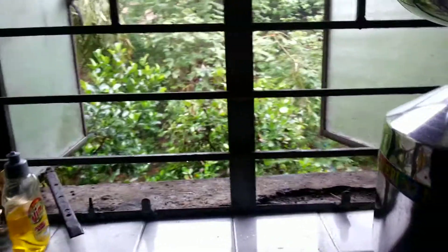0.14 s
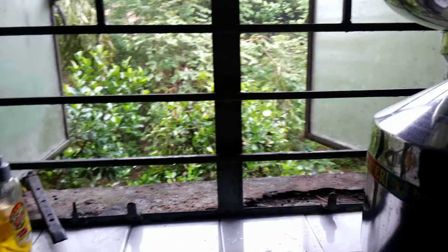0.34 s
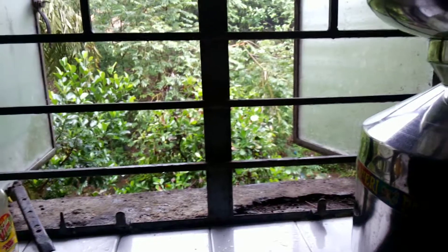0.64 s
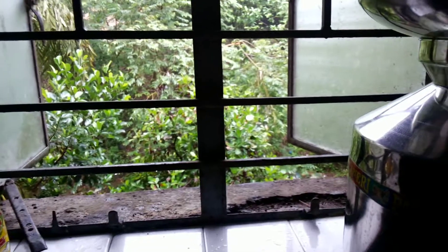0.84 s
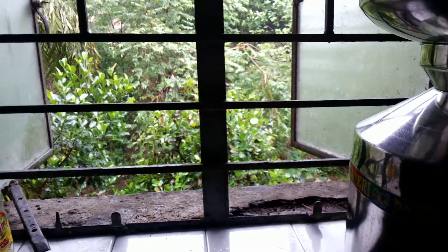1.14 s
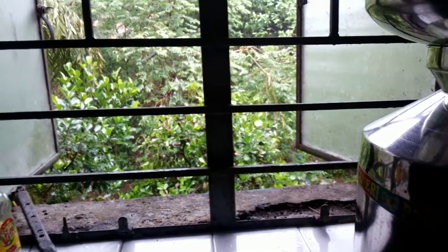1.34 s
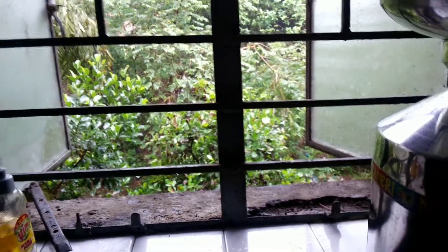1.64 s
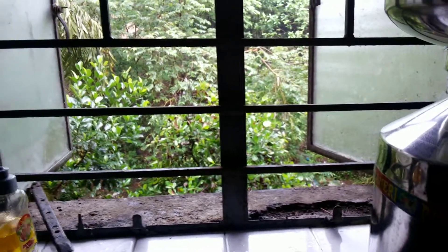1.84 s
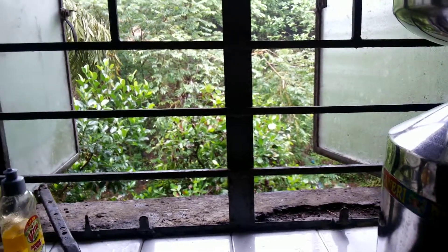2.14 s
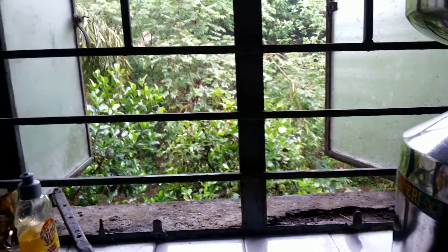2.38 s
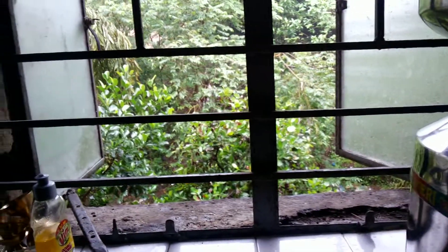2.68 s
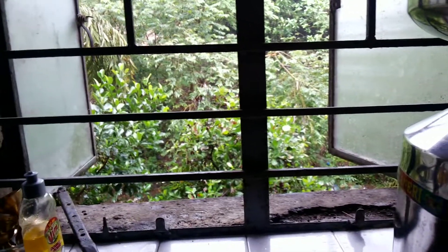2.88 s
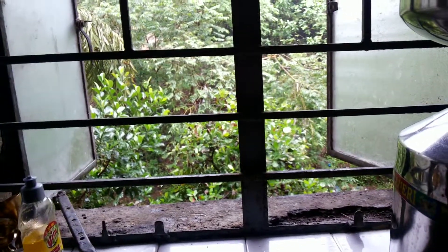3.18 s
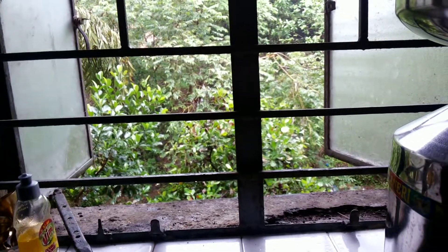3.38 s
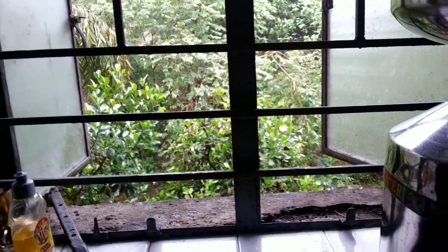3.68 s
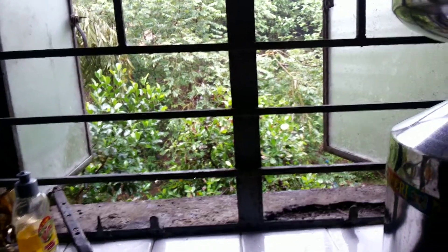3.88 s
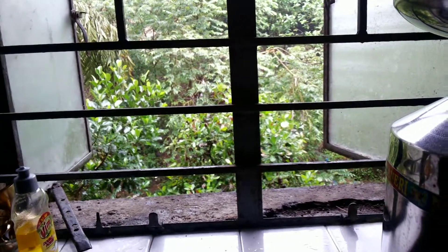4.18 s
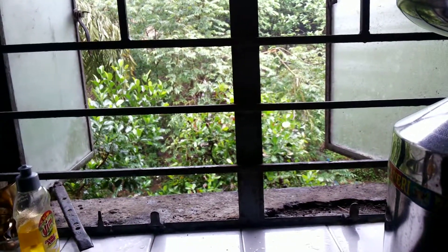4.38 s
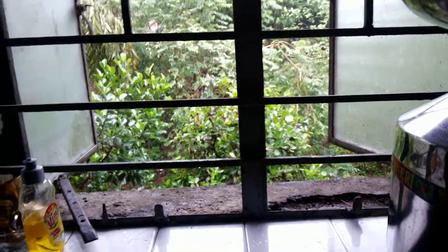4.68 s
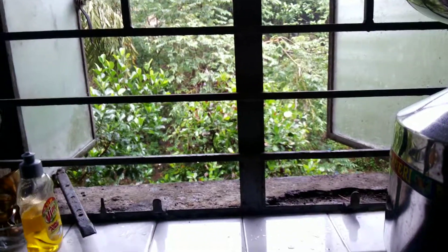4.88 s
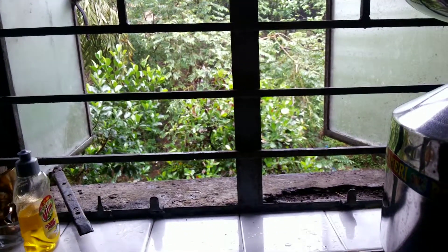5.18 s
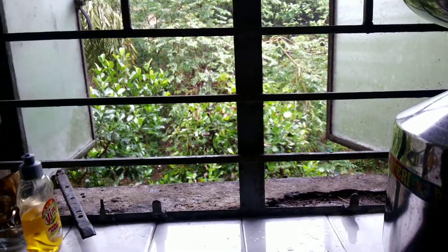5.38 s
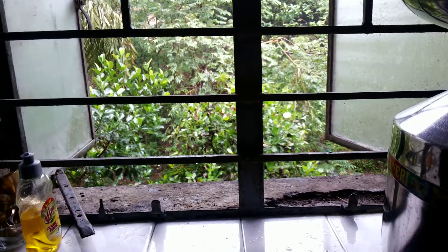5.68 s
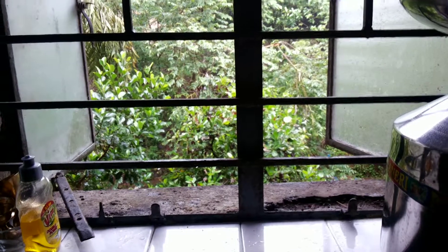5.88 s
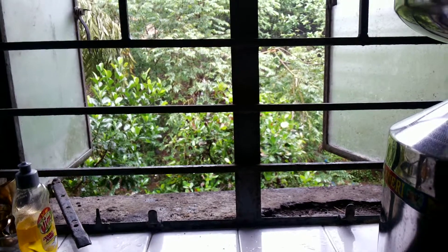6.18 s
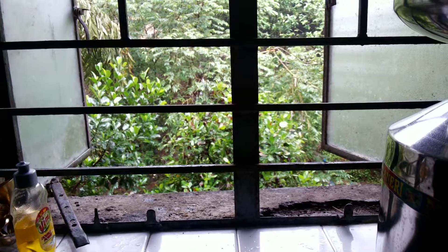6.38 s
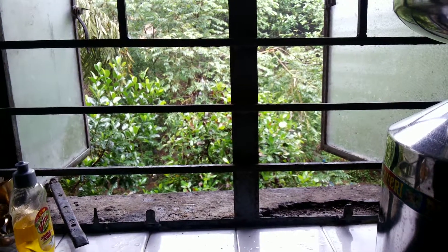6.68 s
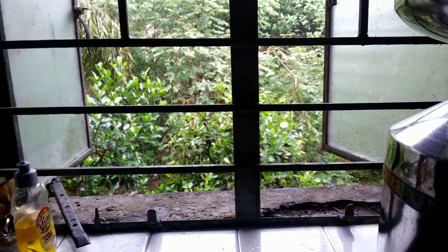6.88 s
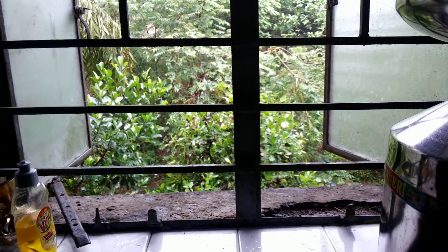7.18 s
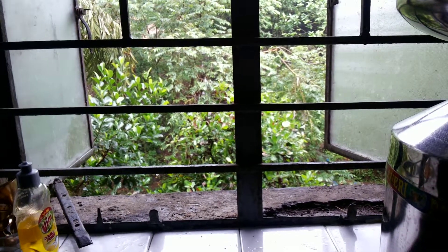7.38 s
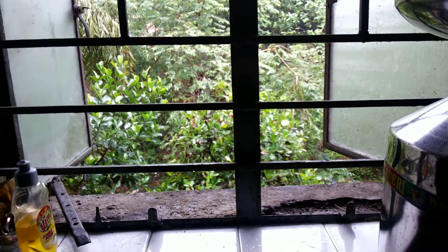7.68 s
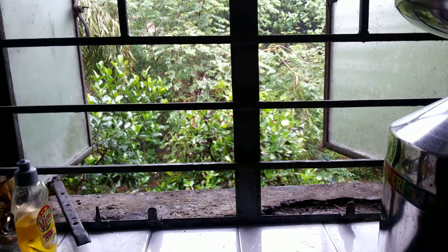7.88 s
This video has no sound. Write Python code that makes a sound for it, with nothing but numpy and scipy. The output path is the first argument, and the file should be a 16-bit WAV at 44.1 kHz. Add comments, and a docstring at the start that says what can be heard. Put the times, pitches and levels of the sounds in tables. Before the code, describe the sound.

A squirrel chirps outside an open kitchen window: one shrill falling call, a couple of short hoarse chirps with light rustles, then three loud calls in quick succession. Three softer rising whines follow, perhaps from a bird. A thin, distant trill comes and goes over a steady garden hiss and a faint machine hum. Heard from indoors, each call rings briefly in the tiled room.

```python
"""Shrill squirrel chirps outside an open kitchen window: notes that whip down, hold, then slide away.
Three rising whines follow, perhaps from a bird; a thin far trill comes and goes.
Chirps and whines are harmonic tones shaped by a throat and roughened by pitch jitter and flutter.
Rustles, ticks and soft bumps are noise bursts. The tiled room rings after each call,
over a steady garden hiss and the faint hum of a household machine."""
import sys
import numpy as np
from scipy import signal
from scipy.fft import rfft, irfft, next_fast_len
from scipy.io import wavfile
from scipy.ndimage import uniform_filter1d, minimum_filter1d

SR = 44100
rng = np.random.default_rng(int(sys.argv[2]) if len(sys.argv) > 2 else 0)


def transcribe(u):
    """Save the signal u as a 16-bit wav file named by the first command-line argument.

    u: samples, shape (n,) or (channels, n), limited to [-1, 1]; the rate is SR.
    q: integer samples, one column per channel.
    """
    v = np.clip(np.atleast_2d(u).T, -1, 1)
    q = np.round(v * 32767).astype(np.int16)
    wavfile.write(sys.argv[1], SR, q)


N = 354563


def squirrel_voice(hz, db, overtones_db, rough, falloff_db=7, jitter=.09):
    """Shrill harmonic tone; as roughness (0-1) rises it tears and its overtones turn to rasp."""
    # Throat response. Each row: frequency in Hz, gain in dB.
    throat = [(1000, -5.5), (3000, 2.5), (5200, 5), (6200, -17.5), (7400, -4.5), (8600, -31), (11000, -17),
              (14000, -43)]
    # Rasp spectrum. Each row: frequency in Hz, relative level in dB.
    air_spectrum = [(2000, -19.5), (3800, -1.5), (4900, 0), (5600, -4), (6500, -13), (7800, -24.5),
                    (8800, -30.5), (12000, -31.5), (15500, -31)]
    size, rough = len(hz), ramp(rough)
    phase = 2 * np.pi * np.cumsum(hz * (1 + jitter * rough * waver(size, rate_hz=397))) / SR
    fundamental = amp(read(throat, hz)) * np.sin(phase) * ragged(size, 1.3 * rough ** 2, rate_hz=370)
    overtones = sum(amp(read(throat, k * hz) - falloff_db * (k - 2)) * np.sin(k * phase)
                    * (k * hz < SR / 2) for k in range(2, 5))
    air = noise(size, lambda f: amp(read(air_spectrum, f))) / np.sqrt(2)
    breakup = np.minimum(2.4 * rough, 1)
    upper = np.sqrt(1 - breakup ** 2) * overtones + breakup * air
    return faded(amp(db) * (fundamental + amp(overtones_db) * upper))


def full_calls(top_hz=5066, sag=.016, slide_octaves=1.17, attack_s=.008, change_s=.007):
    """Squirrel: a rough whip down to a pure, sagging note, which tears into a fading slide."""
    # Each row: start, whip, hold and slide in seconds, held pitch in Hz, whip gain in dB,
    # whip roughness 0-1, then held gain, swell over the hold, held overtones and slide gain in dB.
    calls = [(0.507, 0.045, .055, 0.037, 2444, -21, 0.34, -20, -9, -28, -24.5),
             (3.037, .019, .054, .056, 3590, -22, .6, -13, 0, -16, -13),
             (3.484, .019, .052, 0.052, 3742, -17, .6, -13, 0.5, -16, -9.5),
             (3.934, 0.018, .049, 0.061, 3603, -19, 0.65, -7.5, -5.5, -26, -11)]
    for (start, whip_s, hold_s, slide_s, held_hz, whip_db, whip_rough,
         held_db, swell_db, overtones_db, slide_db) in calls:
        release_s = whip_s + hold_s
        t = np.arange(0, release_s + slide_s, 1 / SR)
        whip = ramp(1 - t / whip_s)
        hold = ramp((t - whip_s) / hold_s) - .5
        slide = ramp((t - release_s) / slide_s)
        octaves = np.log2(top_hz / held_hz) * whip ** 2.1 - slide_octaves * slide ** .85
        hz = held_hz * 2 ** octaves * (1 - sag * hold)
        # Crossfade weights of the three stages.
        whipping, sliding = ramp((whip_s - t) / change_s), ramp((t - release_s) / change_s)
        holding = 1 - whipping - sliding
        db = (whipping * (whip_db - 6 * ramp(1 - t / attack_s))
              + holding * (held_db + swell_db * hold)
              + sliding * (slide_db - 26 * slide ** 4))
        upper_db = -9 * whipping + holding * overtones_db - 15 * sliding
        rough = whipping * whip_rough * np.sqrt(whip) + .034 * holding + .35 * sliding
        yield start, squirrel_voice(hz, db, upper_db, rough)


def lead_ins(scoop=.34, rasp_share=.55, attack_s=.0076):
    """The squirrel's voice catches: flat, weak and raspy, then clearer and on pitch."""
    # Each row: start and length in seconds, pitch in Hz, gain and overtones in dB,
    # first and last roughness 0-1.
    notes = [(0.467, 0.037, 5150, -21.5, -14, 0.82, 0.28), (2.608, .034, 1480, -44, 11, .03, .04),
             (2.995, 0.038, 2354, -33.5, -3.5, 0.8, 0.1), (3.435, .046, 2414, -33.5, -4, .9, 0),
             (3.888, .051, 2415, -36, -1, .9, 0)]
    for start, length_s, hz, db, overtones_db, first_rough, last_rough in notes:
        u = progress(length_s)
        catching = ramp(1 - u / rasp_share)
        pitch_hz = hz * (1 - scoop * first_rough * catching ** 2)
        envelope_db = -13.5 * catching - 18 * ramp(1 - u * length_s / attack_s)
        upper_db = overtones_db + 26.5 * first_rough * catching
        rough = last_rough + (first_rough - last_rough) * np.sqrt(catching)
        yield start, squirrel_voice(pitch_hz, db + envelope_db, upper_db, rough)


def short_chirps(peak_share=.71, dulling_db=18):
    """Squirrel: single hoarse falls that swell, lose their overtones and stop."""
    # Each row: start and length in seconds, first and last pitch in Hz, gain and overtones in dB,
    # roughness 0-1.
    chirps = [(0.413, 0.068, 3350, 2170, -26, -4, 0.2), (1.822, .066, 3273, 1738, -23.5, -10.5, 0.23),
              (2.625, 0.054, 3012, 1769, -21, -8, 0.35)]
    for start, length_s, first_hz, last_hz, db, overtones_db, rough in chirps:
        u = progress(length_s)
        hz = first_hz * (last_hz / first_hz) ** (u ** .85)
        rise_db = -17 * ramp(1 - u / peak_share) ** 2
        fade_db = -19 * ramp((u - peak_share) / (1 - peak_share)) ** 2
        upper_db = overtones_db - dulling_db * (u - .5)
        yield start, squirrel_voice(hz, db + rise_db + fade_db, upper_db, rough)


def ticks():
    """Bright snaps, about a millisecond long, at the height of two chirps."""
    # Each row: start in seconds, level in dB.
    snaps = [(3.566, -35), (4.0285, -33.5)]
    for start, db in snaps:
        click = np.diff(rng.standard_normal(91))
        yield start, amp(db) * unit(click * np.hanning(len(click)) ** 2)


def whine_voice(hz, db, bright_db, harmonics, jitter, rough):
    """Shaky harmonics through a fixed throat; the upper ones are hoarse."""
    # Throat response. Each row: frequency in Hz, gain in dB.
    throat = [(600, -16), (950, -13.5), (1250, 1), (2800, 1), (3500, 0), (4300, 14), (5400, 2), (8000, 9.5),
              (9500, -10)]
    size = len(hz)
    phase = 2 * np.pi * np.cumsum(hz * (1 + jitter * waver(size, rate_hz=144))) / SR
    tone = np.zeros(size)
    for k, harmonic_db in harmonics:
        partial_db = harmonic_db + read(throat, k * hz) + bright_db * max(k - 2, 0)
        tone += amp(partial_db) * np.sin(k * phase) * ragged(size, rough * k ** 2, rate_hz=550)
    return faded(tone * amp(db))


def nasal_whine():
    """A high whine that falters once and dulls as it climbs."""
    # Contour. Each row: time in seconds, pitch in Hz, gain in dB.
    curve = [(5.211, 1282, -47), (5.238, 1420, -31), (5.256, 1390, -30), (5.278, 1315, -40),
             (5.300, 1405, -31), (5.322, 1389, -34), (5.340, 1476, -29), (5.392, 1598, -27.5),
             (5.445, 1650, -39)]
    # Each row: harmonic number, gain in dB.
    harmonics = [(1, -9.5), (2, 3), (3, -11.5), (4, -11), (5, -28), (6, -29)]
    times, pitches_hz, gains_db = np.transpose(curve)
    t = np.arange(times[0], times[-1] + .0019, 1 / SR)
    hz, db = np.interp(t, times, pitches_hz), np.interp(t, times, gains_db)
    bright_db = 4 - 34 * np.log2(hz / hz[0])
    return times[0], whine_voice(hz, db, bright_db, harmonics, jitter=.004, rough=.005)


def hollow_whines(attack_s=.026, release_s=.03, hoarse_s=.046):
    """Whines that start hoarse, climb about an octave and ease off at the top."""
    # Each row: start and length in seconds, first and last pitch in Hz, gain and swell in dB,
    # brightness in dB per harmonic above the second.
    rises = [(6.136, .211, 677, 1344, -38, -5, -1), (7.218, .230, 632, 1398, -37.5, 4, -0.5)]
    # Each row: harmonic number, gain in dB.
    harmonics = [(1, 0), (2, 2), (3, -16), (4, -17), (5, -25), (6, -30)]
    for start, length_s, first_hz, last_hz, db, swell_db, bright_db in rises:
        u = progress(length_s)
        t = u * length_s
        hz = last_hz + (first_hz - last_hz) * (1 - u) ** 1.2
        edges = ramp(1 - t / attack_s) + ramp(1 - (length_s - t) / release_s)
        envelope_db = swell_db * (u - .5) - 9.5 * edges
        upper_db = bright_db + 6 * ramp(1 - t / hoarse_s)
        yield start, whine_voice(hz, db + envelope_db, upper_db, harmonics, jitter=.009, rough=.012)


def far_trills(note_hz=6400, notes_per_s=4, arch=.019, quaver=.009):
    """Strings of thin, uneven notes, each a small arch in pitch."""
    # Each row: start and end in seconds, level in dB.
    trills = [(0.967, 1.64, -57.5), (2.871, 3.757, -56.5), (5.127, 5.857, -57)]
    for start, end, db in trills:
        t = np.arange(0, end - start, 1 / SR)
        note = abs(np.sin(np.pi * notes_per_s * t))
        hz = note_hz * (1 + arch * (note - .5) + quaver * waver(len(t), rate_hz=170))
        envelope = amp(db) * note ** 2 * ragged(len(t), rough=.4, rate_hz=40)
        yield start, faded(envelope * np.sin(2 * np.pi * np.cumsum(hz) / SR))


def rustles_and_bumps():
    """Short rasps and rustles, and soft low bumps: one puff of noise each."""
    # Each row: start and length in seconds, level in dB, centre in Hz, width in octaves.
    rustles = [(1.182, .366, -56.5, 1960, 0.24), (1.447, 0.29, -51, 1622, .21),
               (1.583, 0.057, -46, 2580, 0.63), (1.599, 0.0092, -39, 4030, 0.13),
               (1.999, 0.07, -43, 2400, 0.67), (2.47, 0.044, -36.5, 2400, 0.71),
               (2.531, 0.049, -39, 2310, 0.74), (4.44, .043, -55, 4200, 0.5),
               (4.431, 0.086, -61, 248, 0.34), (7.907, .129, -55.5, 1590, .255)]
    # Each row: start in seconds, level in dB.
    bumps = [(3.959, -80), (4.361, -68), (4.797, -65), (5.865, -65)]
    for start, length_s, db, centre_hz, octaves in rustles:
        yield start, puff(length_s, db, centre_hz, octaves)
    for start, db in bumps:
        yield start, puff(length_s=.11, db=db, centre_hz=68, octaves=.46)


def garden():
    """Low murmur and leafy hiss, both drifting a little."""
    # Two noise spectra. Each row: frequency in Hz, relative density in dB.
    murmur_spectrum = [(20, -24.5), (45, -30.5), (70, -11), (88, -20.5), (120, -6), (200, -2), (300, 0),
                       (400, -2), (540, -2), (630, -5), (1000, -8.5), (1400, -33.5)]
    hiss_spectrum = [(590, -29.5), (1000, -6.5), (1300, -7), (1570, -6), (2550, -4.5), (2760, -9.5),
                     (3000, -5.5), (3250, -5.5), (3560, -9), (3730, -5.5), (3950, -5.5), (4090, -3),
                     (4810, -6.5), (6800, -21.5), (15800, -28.5)]
    # Each row: time in seconds, murmur and hiss levels in dB.
    levels = [(0, -54.5, -49.5), (1.4, -54, -49.5), (2.3, -55, -50.5), (3.3, -52.5, -48.5),
              (4.3, -53.5, -50), (4.9, -54.5, -51), (6.5, -55, -51), (8.04, -55, -49.5)]
    times, murmur_db, hiss_db = np.transpose(levels)
    t = np.arange(N) / SR
    murmur = noise(N, lambda hz: amp(read(murmur_spectrum, hz)))
    murmur *= amp(np.interp(t, times, murmur_db) + .5 * waver(N, rate_hz=4.8))
    hiss = noise(N, lambda hz: amp(read(hiss_spectrum, hz)))
    hiss *= amp(np.interp(t, times, hiss_db) + .12 * waver(N, rate_hz=8.5))
    return murmur + hiss


def hum(drift_hz=2.515, flutter=.26):
    """Faint wavering tones of a household machine."""
    # Each row: frequency in Hz, level in dB.
    tones = [(441.4, -65), (543.7, -63), (2659, -66.5), (3844, -61)]
    out = np.zeros(N)
    for hz, db in tones:
        phase = 2 * np.pi * np.cumsum(hz + drift_hz * waver(N, rate_hz=7.7)) / SR
        out += amp(db) * unit(np.sin(phase) * (1 + flutter * waver(N, rate_hz=12)))
    return out


def kitchen(x, scatter_s=.011, build_up_s=.008):
    """Direct sound, quick scatter off shutters and sill, and a dense tail that dies band by band."""
    # Each row: frequency in Hz, time to decay 60 dB in seconds.
    t60 = [(200, .45), (1500, 0.45), (3000, 0.48), (5000, 0.36), (10000, 0.49)]
    direct_db, scatter_db, tail_db = -4.5, -5, -1
    hz, t, bands = signal.stft(rng.standard_normal(SR), SR, nperseg=256)
    tail = signal.istft(bands * amp(-60 * t / read(t60, hz)[:, None]), SR, nperseg=256)[1]
    t = np.arange(len(tail)) / SR
    tail *= 1 - np.exp(-t / build_up_s)
    scatter = rng.standard_normal(len(t)) * np.exp(-t / scatter_s)
    response = amp(tail_db) * tail / np.linalg.norm(tail)
    response += amp(scatter_db) * scatter / np.linalg.norm(scatter)
    response[0] += amp(direct_db)
    return signal.fftconvolve(x, response)


def puff(length_s, db, centre_hz, octaves):
    """Tapered burst of noise in one band."""
    size = int(length_s * SR)
    band = noise(size, lambda hz: np.exp(-.5 * (np.log2((hz + 1) / centre_hz) / octaves) ** 2))
    return amp(db) * band * signal.windows.tukey(size, .5)


def noise(size, shape):
    """Noise of rms 1 with magnitude spectrum shape(Hz)."""
    length = next_fast_len(size + 2048)
    hz = np.fft.rfftfreq(length, 1 / SR)
    return unit(irfft(rfft(rng.standard_normal(length)) * shape(hz), length))[:size]


def waver(size, rate_hz):
    """Smooth random motion up to rate_hz."""
    return noise(size, lambda hz: 1 / (1 + (hz / rate_hz) ** 4))


def ragged(size, rough, rate_hz):
    """Gain of steady power: constant at roughness 0, pure flutter at 1."""
    rough = ramp(rough)
    return np.sqrt(1 - rough) + np.sqrt(rough) * waver(size, rate_hz)


def faded(x, edge_s=.0007):
    """Soft start and stop."""
    t = np.arange(len(x)) / SR
    return x * ramp(np.minimum(t, t[-1] - t) / edge_s)


def amp(db):
    """Decibels to gain."""
    return 10 ** (np.asarray(db) / 20)


def unit(x):
    """Scales to rms 1."""
    return x / np.sqrt(np.mean(x ** 2) + 1e-20)


def read(points, hz):
    """Interpolates on a log-frequency axis."""
    f, value = np.transpose(points)
    return np.interp(np.log(hz + 1), np.log(f + 1), value)


def ramp(x):
    """Clips to 0-1."""
    return np.clip(x, 0, 1)


def progress(length_s):
    """Runs from 0 to 1."""
    return np.linspace(0, 1, int(length_s * SR))


def add(mix, start_s, sound):
    """Mixes a sound in at start_s."""
    part = mix[max(round(start_s * SR), 0):][:len(sound)]
    part += sound[:len(part)]


def scene():
    """The callers move about, so each sound takes its own path into the room and keeps its energy."""
    sounds = [*full_calls(), *lead_ins(), *short_chirps(), nasal_whine(), *hollow_whines(),
              *far_trills(), *rustles_and_bumps()]
    mix = garden() + hum()
    for start, sound in sounds:
        heard = kitchen(sound)
        add(mix, start, heard * np.linalg.norm(sound) / np.linalg.norm(heard))
    for start, tick in ticks():  # no room ring
        add(mix, start, tick)
    return mix[None]


def record(dry, threshold=.82, ceiling=.75, knee=14, cutoff_hz=15800):
    """A quick limiter holds the loudest peaks down and rounds their tips; then a low-pass."""
    gain = np.minimum(1, threshold / (abs(dry) + 1e-9))
    limited = dry * uniform_filter1d(minimum_filter1d(gain, size=131), size=131)
    rounded = limited / (1 + abs(limited / ceiling) ** knee) ** (1 / knee)
    lowpass = signal.firwin(511, cutoff_hz, window=("kaiser", 9), fs=SR)
    return signal.oaconvolve(rounded, lowpass[None], "same")


dry = scene()
out = record(dry)
transcribe(out)
```